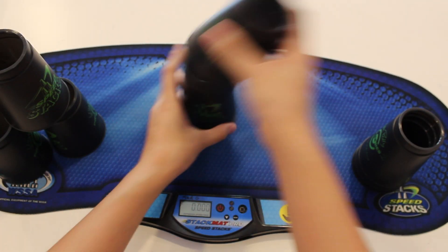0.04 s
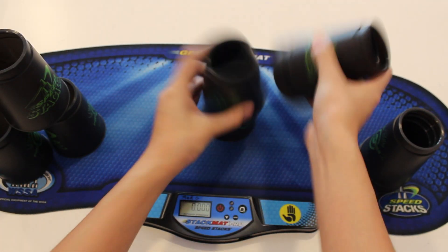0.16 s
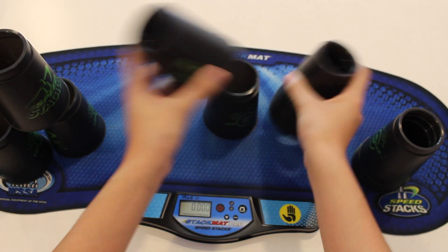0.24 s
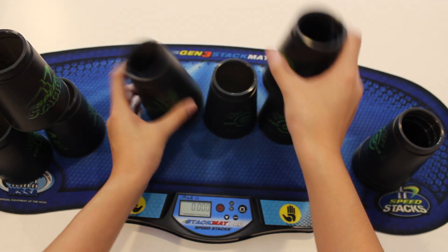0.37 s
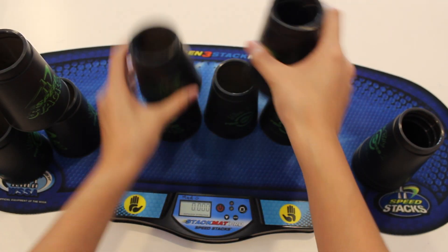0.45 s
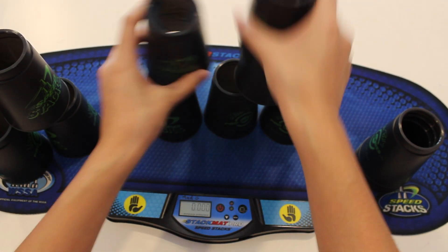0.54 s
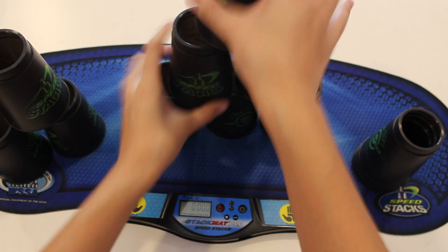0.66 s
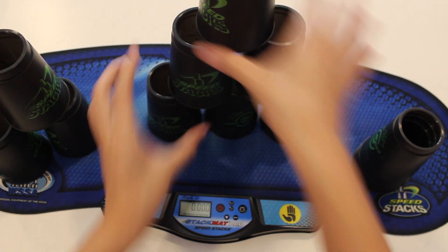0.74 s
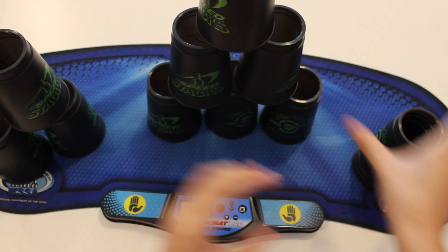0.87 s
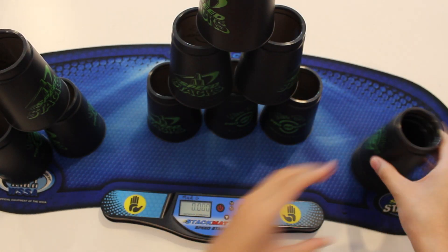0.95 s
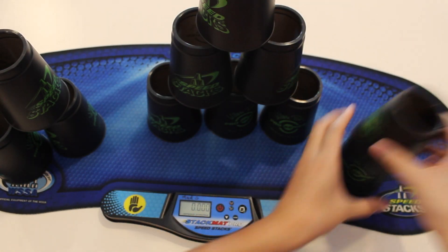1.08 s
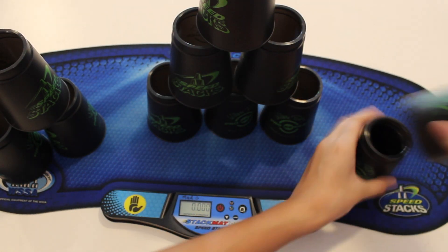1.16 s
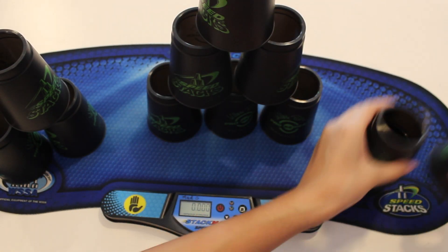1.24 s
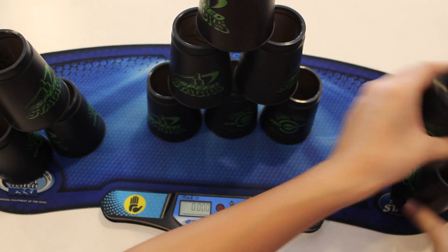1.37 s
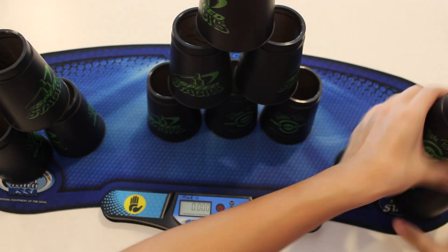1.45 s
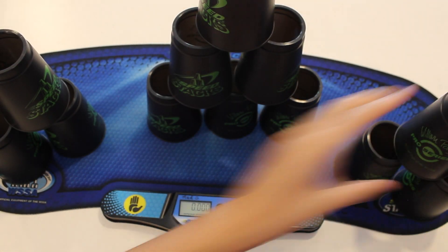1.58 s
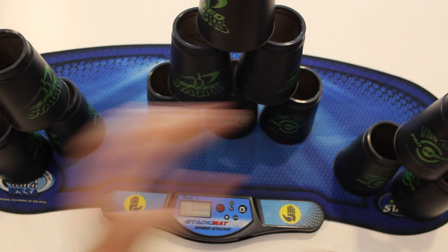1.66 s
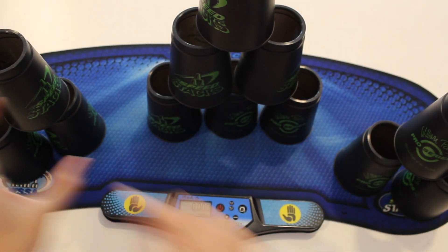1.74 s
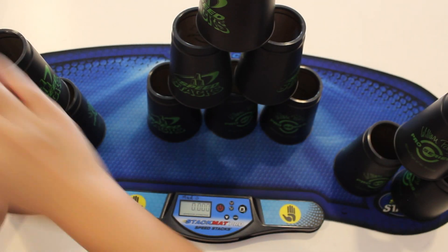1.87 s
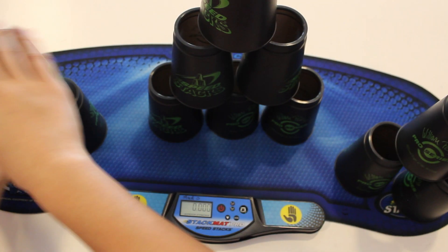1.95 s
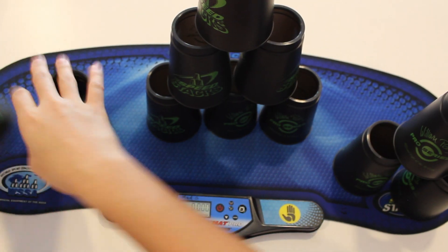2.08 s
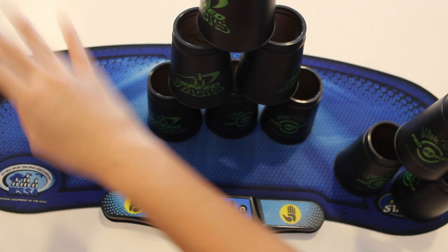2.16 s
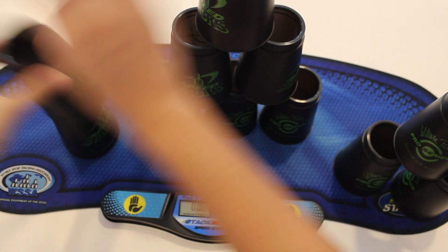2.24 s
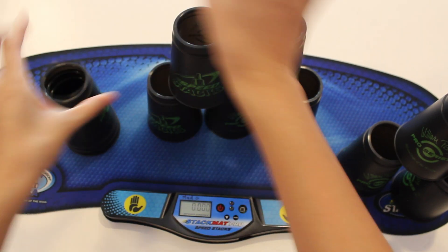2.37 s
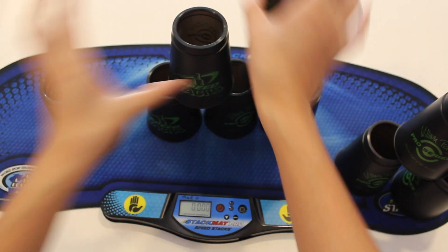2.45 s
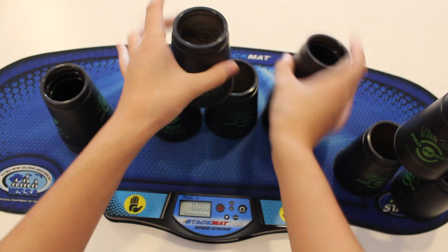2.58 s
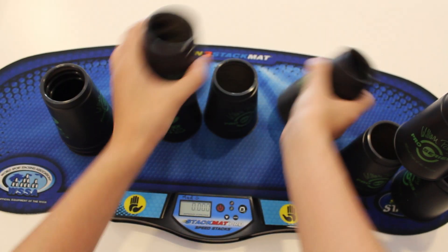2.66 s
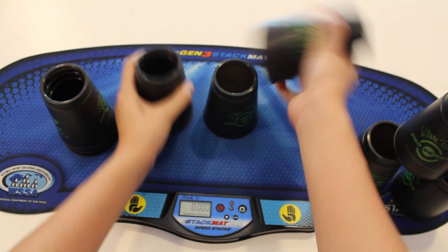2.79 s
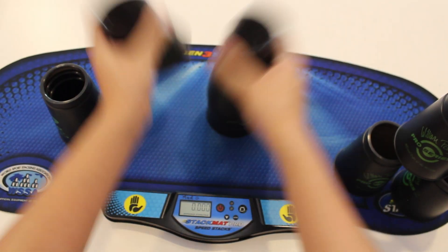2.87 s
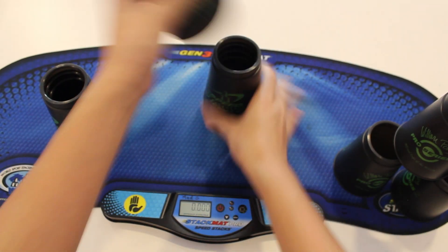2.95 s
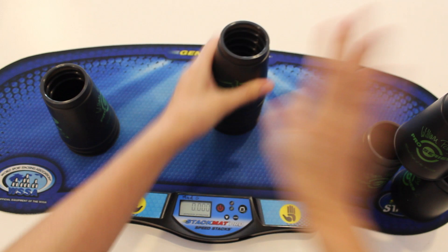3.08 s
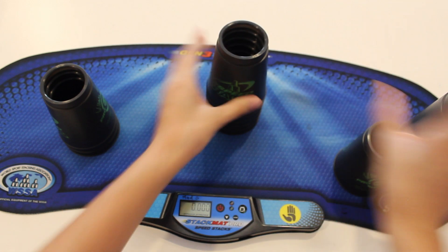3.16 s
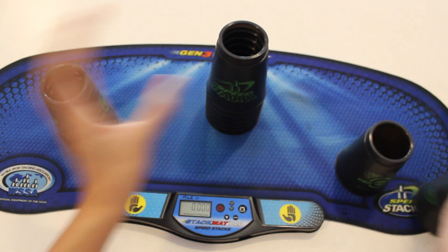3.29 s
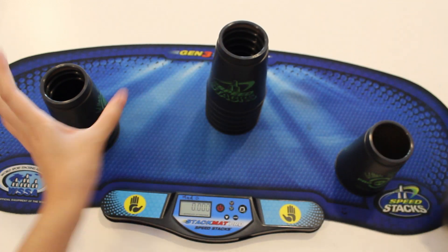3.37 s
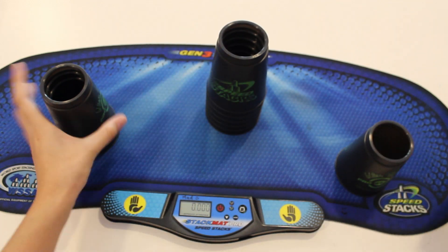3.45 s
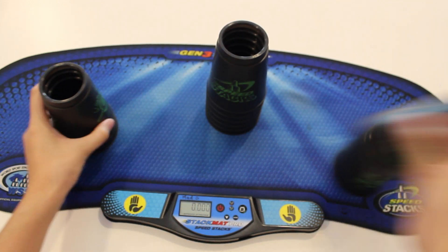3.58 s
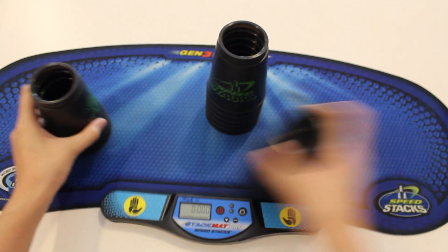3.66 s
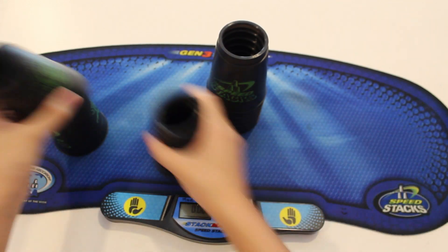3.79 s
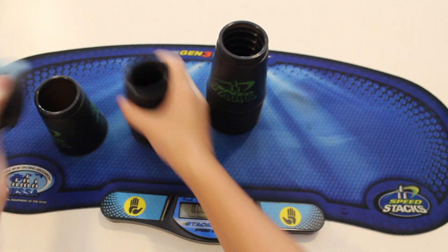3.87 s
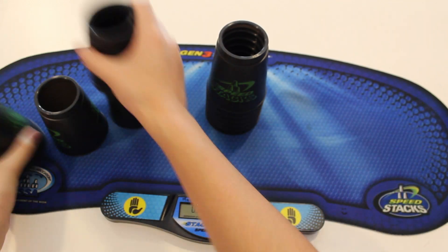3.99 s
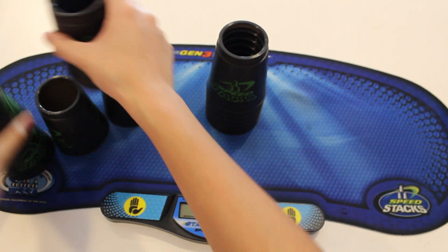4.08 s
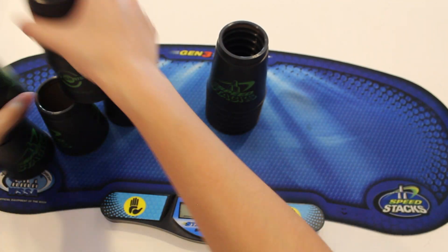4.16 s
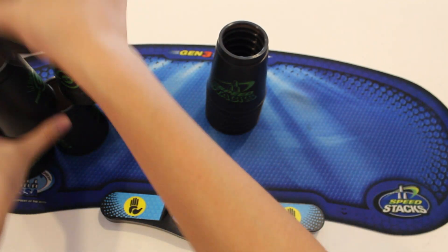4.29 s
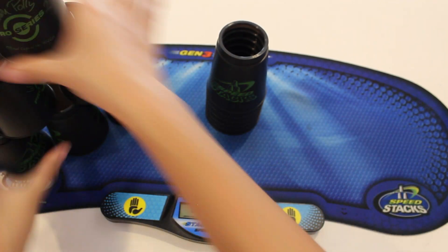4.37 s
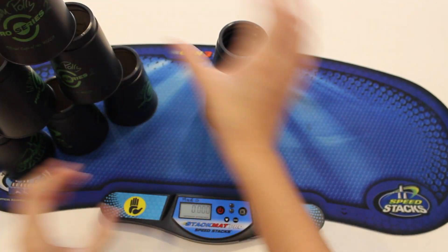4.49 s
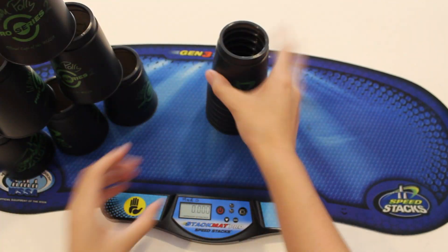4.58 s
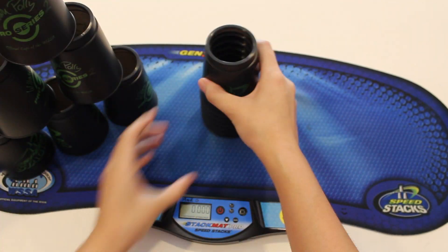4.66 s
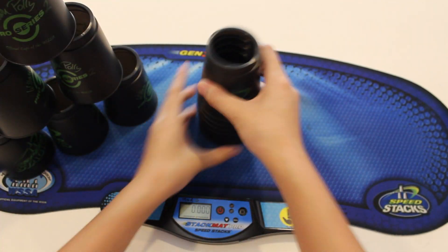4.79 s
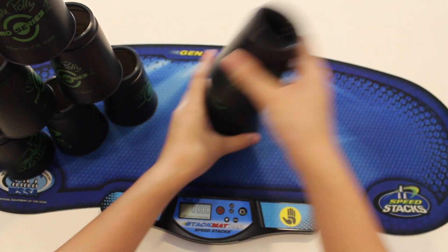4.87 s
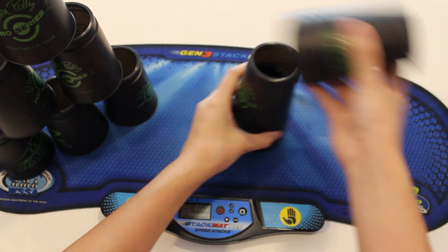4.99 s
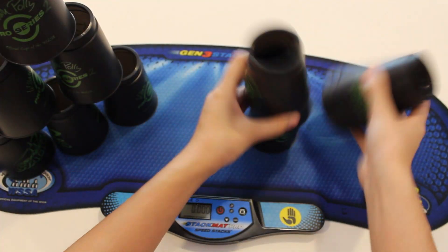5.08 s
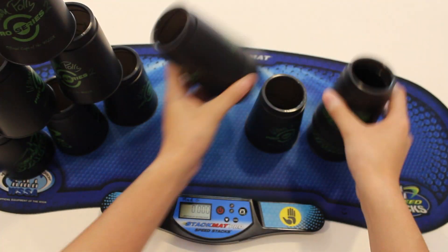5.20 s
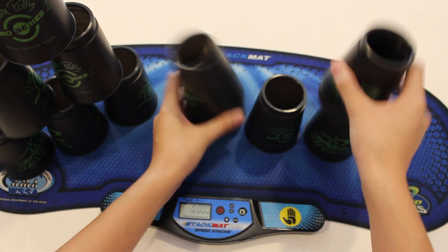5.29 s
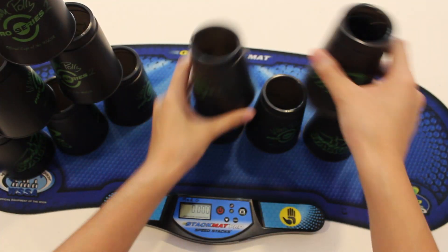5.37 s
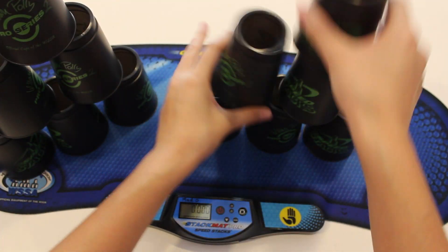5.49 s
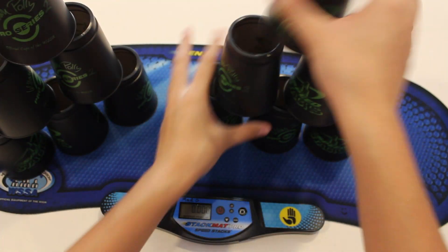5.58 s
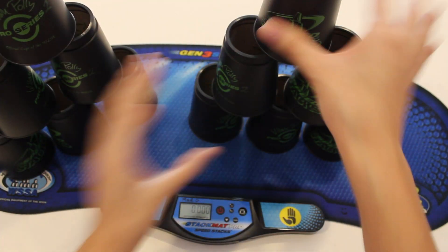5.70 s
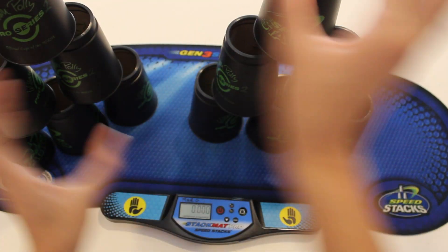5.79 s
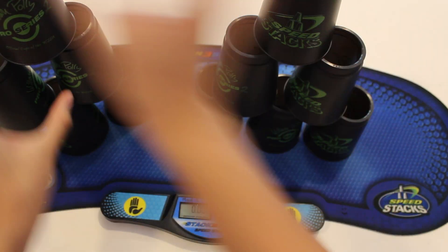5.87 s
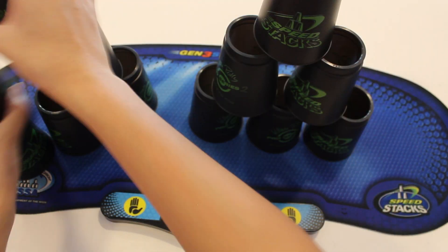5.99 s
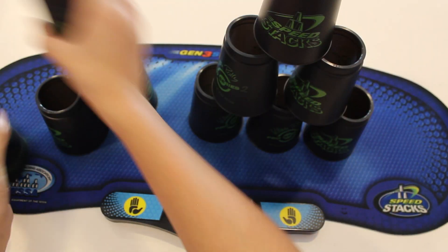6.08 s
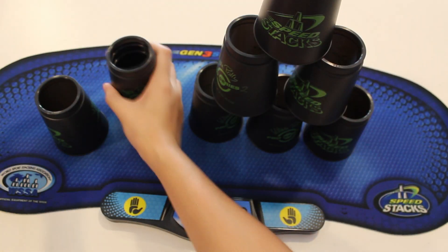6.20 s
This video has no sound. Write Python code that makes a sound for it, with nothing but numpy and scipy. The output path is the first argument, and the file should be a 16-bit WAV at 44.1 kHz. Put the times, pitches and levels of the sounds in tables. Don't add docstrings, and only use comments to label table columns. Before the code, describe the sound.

Hard plastic cups clack, knock and rattle in fast uneven bursts on a padded table mat, heard close up in a small room.

```python
import sys
import numpy as np
from scipy import signal
from scipy.fft import rfft, irfft
from scipy.io import wavfile
from scipy.ndimage import uniform_filter1d

SR = 44100
rng = np.random.default_rng(int(sys.argv[2]) if len(sys.argv) > 2 else 0)


def store_pcm(level_fs):
    pcm = np.round(np.clip(level_fs, -1, 1) * 32767).astype(np.int16)
    wavfile.write(sys.argv[1], SR, np.atleast_2d(pcm).T)


def undo_db(level):
    steps = np.asarray(level, float) / 20
    return 10 ** steps


N = 275184

# (frequency [Hz], level [dB per Hz])
ROOM_NOISE = [(15, -6), (25, -24), (108, 5), (134, -2.5), (195, 8), (326, -11.5), (714, 8), (863, 2),
              (2280, -7), (9570, -23), (16000, -23)]
# (frequency [Hz], level [dB per Hz])
SCRAPE_COLOUR = [(590, -4.5), (1000, 12), (1610, 7.5), (1910, 7.5), (2390, 4), (2940, 5.5), (5500, 0),
                 (8360, -6.5), (16000, -16.5)]
# (frequency [Hz], level [dB per Hz])
RUMBLE_COLOUR = [(71, -49), (120, -24.5), (270, -7.5), (326, -7.5), (399, -5), (2000, -29), (2600, -68),
                 (4400, -120)]
# (frequency [Hz], time to fall 60 dB [s])
ROOM_DECAY = [(300, .33), (700, .37), (1600, .36), (3400, .36), (6500, .34), (12000, .2)]
# (frequency [Hz], level [dB])
WALL_MODES = [(1240, -10), (1850, -26), (2930, -9.5), (3820, -12), (5300, -26)]
# (frequency [Hz], level [dB])
TABLE_MODES = [(204, 4.5), (290, 4), (360, -9), (450, -6.5), (614, 1), (720, -12.5)]

# (middle [s], level [dB], spread [s])
HAND_BRUSHES = [(0, -45, 0.046), (.3, -46.5, 0.2), (.6, -49.5, 0.11), (1.25, -49, 0.1), (1.5, -58, 0.11),
                (2.02, -42, 0.034), (2.3, -45.5, 0.21), (2.55, -34.5, 0.069), (2.75, -39, 0.094),
                (3.1, -41.5, 0.096), (3.45, -41, 0.08), (3.87, -39, 0.053), (4.1, -44, 0.087),
                (4.97, -43, 0.086), (5.15, -67, 0.065), (5.4, -42, 0.19), (5.6, -38, 0.034),
                (6.08, -48, 0.078)]
# (middle [s], level [dB], spread [s])
MAT_DRAGS = [(.25, -50, 0.23), (.65, -45, 0.12), (1.14, -54, 0.08), (1.325, -42, 0.037), (1.6, -61, 0.24),
             (2.03, -40, 0.043), (2.18, -31.5, 0.05), (2.56, -36, 0.11), (2.88, -38, 0.13),
             (3.34, -42.5, 0.11), (3.715, -23, 0.035), (4.1, -35.5, 0.067), (4.32, -33, 0.08),
             (4.7, -40.5, 0.021), (5.12, -46.5, 0.15), (5.6, -26.5, 0.077), (6.05, -60, 0.16),
             (6.24, -36, 0.11)]
# (start [s], end [s], level [dB], wall pitch [Hz])
CUP_SLIDES = [(0.34, 0.399, -35, 3010), (2.107, 2.115, -29.5, 3200), (2.49, 2.59, -44, 2860),
              (2.906, 3.006, -46.5, 3020), (3.311, 3.378, -41, 3020), (5.35, 5.433, -48, 2870),
              (3.68, 3.772, -35, 1890), (5.043, 5.127, -44.5, 2840), (6.023, 6.073, -39.5, 4160),
              (6.131, 6.134, -26, 5040)]
# (time [s], peak [dB], pitch [Hz])
GRAZES = [(0.57, -29, 3930), (.7797, -56, 4160), (1.126, -40.5, 3160), (1.244, -42, 2540),
          (1.5779, -53, 2740), (1.955, -53, 2650), (2.3252, -30, 6440), (2.352, -35, 2950),
          (2.3601, -37, 4950), (2.408, -30, 3170), (2.533, -28, 4500), (2.673, -35, 3300),
          (2.7093, -29, 5310), (2.903, -31, 4580), (2.9483, -41, 2730), (2.955, -33, 3180),
          (3.0281, -48, 3120), (3.0884, -39, 6500), (3.29, -40, 4500), (3.2965, -31, 4370),
          (3.3396, -28, 5470), (3.4023, -37, 5600), (3.453, -41, 2710), (3.9044, -42, 2600),
          (4.095, -24, 3030), (4.2294, -33, 5000), (4.6589, -43, 3600), (4.9162, -34, 3120),
          (5.06, -46, 4080), (5.067, -37, 3040), (5.107, -38, 4150), (5.223, -26.5, 5800),
          (5.2346, -36, 3070), (5.367, -24, 5000), (5.3932, -38, 4800), (5.544, -34, 5310),
          (6.0029, -40, 4490), (6.0827, -37, 4960), (6.1236, -19, 4770), (6.193, -27, 5000),
          (3.722, -30, 4770), (3.731, -21, 3300), (3.735, -22, 5200), (6.074, -34, 3100),
          (6.1768, -24, 2940), (0.133, -43, 9000)]
# (time [s], pitch [Hz], level [dB], time to fall 60 dB [s])
WALL_SHIVERS = [(.194, 1040, -38, 0.26), (0.55, 1900, -29.5, 0.44), (.674, 1310, -23, 0.071),
                (.72, 1240, -29, 0.32), (.72, 2040, -57, 0.25), (1.405, 1260, -27, 0.18),
                (1.405, 602, -8.5, 0.077), (2.442, 1800, -17, 0.032), (4.363, 1310, -35, 0.43),
                (1.487, 744, -23, 0.44), (1.487, 965, -30, 0.22), (1.961, 2170, -24.5, 0.092),
                (2.032, 1110, -28, 0.38), (2.151, 1930, -35, 0.63), (2.151, 900, -36, 0.58),
                (2.443, 1480, -28, 0.33), (2.497, 683, -35.5, 0.41), (2.497, 1470, -31, .3),
                (2.577, 1120, -30, 0.14), (2.577, 1990, -36, 0.33), (2.641, 1464, -21, 0.19),
                (2.69, 853, -20.5, 0.17), (2.689, 1840, -38, .3), (2.745, 830, -36, 0.17),
                (3.729, 1127, -27.5, 0.4), (3.784, 1135, -31, 0.27), (4.088, 1780, -40, .3),
                (4.87, 1220, -34.5, 0.32), (5.358, 1650, -30.5, 0.17), (5.616, 1250, -27, 0.54),
                (5.665, 1236, -24, 0.21), (6.013, 1250, -35, 0.22), (6.081, 1440, -24, 0.071),
                (6.13, 1870, -38, .3), (6.173, 2100, -38, 0.18),
                (0.456, 3080, -36, 0.41), (0.454, 4440, -39, 0.27), (.549, 3260, -39, 0.35),
                     (0.547, 3930, -33.5, 0.33), (0.548, 5370, -36, 0.42), (.68, 5050, -29, 0.073),
                     (.72, 5200, -34, 0.18), (5.664, 5200, -42, .3), (1.487, 5200, -48, .3),
                     (2.075, 3200, -42, 0.18), (2.076, 3840, -32, .2), (2.076, 6270, -36, 0.22),
                     (2.106, 4130, -29, 0.13), (2.153, 3100, -36, .3), (2.152, 5430, -36, 0.1),
                     (2.192, 3120, -41, 0.33), (2.545, 3000, -28, 0.062), (2.576, 3870, -29, 0.24),
                     (2.69, 5400, -36, 0.18), (2.796, 2920, -39, 0.12), (2.972, 3200, -34, 0.43),
                     (2.972, 3800, -45, 0.36), (3.125, 2420, -36, 0.42), (3.123, 3430, -31, 0.19),
                     (3.425, 3840, -41, 0.25), (3.728, 3080, -26.5, 0.21), (4.198, 2790, -29, 0.098),
                     (4.199, 5100, -32, 0.18), (4.265, 4100, -43, 0.34), (5.044, 4140, -47, .3),
                     (5.06, 2900, -45, 0.45), (5.078, 4730, -46, .1), (5.1, 4200, -37.5, 0.1),
                     (5.1, 5630, -46, 0.18), (5.157, 3280, -44, 0.31), (5.203, 3940, -38.5, 0.34),
                     (5.204, 3020, -32, 0.26), (5.281, 3060, -34, .15), (5.357, 2910, -26, 0.22),
                     (5.358, 3970, -17.5, 0.063), (5.511, 3880, -35, .2), (5.571, 2800, -46, .2),
                     (5.614, 3925, -36, 0.24), (5.615, 5530, -34, 0.2), (6.035, 4040, -43, .1),
                     (6.063, 2900, -46, 0.32), (6.063, 5300, -44, .3), (6.172, 3350, -11, 0.047),
                     (6.173, 4950, -41, 0.14)]

# (time [s], peak [dB], air pitch [Hz], time to fall 60 dB [s])
MAT_LANDINGS = [(0.153, -25, 245, 0.022), (0.4455, -13, 320, 0.04), (1.408, -10.5, 405, 0.035),
                (2.1072, -14.5, 587, 0.03), (2.1502, -23.5, 740, 0.018), (2.6907, -10.5, 790, 0.025),
                (2.7932, -23, 527, 0.029), (3.1237, -16.5, 468, 0.03), (4.0118, -29.5, 282, 0.02),
                (4.3608, -11, 595, 0.041), (4.8668, -23, 359, 0.089), (4.9363, -25, 352, 0.069),
                (5.1198, -23.5, 266, 0.045), (5.2025, -11, 281, 0.06), (5.3516, -6.5, 355, 0.026),
                (5.3819, -22.5, 360, 0.04), (6.171, -16, 810, 0.03)]
# (time [s], peak [dB], air pitch [Hz], time to fall 60 dB [s])
STACK_LANDINGS = [(0.2667, -21, 328, 0.028), (0.3255, -18, 254, 0.049), (0.5506, -7.5, 652, 0.016),
                  (1.0238, -35, 288, 0.11), (1.3915, -5, 420, 0.07), (2.3673, -30.5, 308, 0.031),
                  (2.97, -9.5, 338, 0.032), (3.6462, -5, 496, 0.023), (3.8207, -23, 672, 0.068),
                  (4.0494, -15, 298, 0.055), (4.0846, -18, 524, 0.072), (4.2914, -16.5, 600, 0.029),
                  (4.3039, -11.5, 626, 0.035), (5.092, -33.5, 402, 0.12), (5.482, -4.5, 560, 0.017),
                  (5.6658, -6, 553, 0.033), (5.7844, -35.5, 588, 0.15)]
# (time [s], peak [dB], air pitch [Hz], time to fall 60 dB [s])
HIGH_LANDINGS = [(0.6141, -26, 690, 0.05), (0.6745, -10, 558, 0.05), (0.7204, -12, 617, 0.042),
                 (1.4881, -2, 665, 0.024), (1.9591, -34.5, 535, 0.12), (2.017, -18.5, 253, 0.07),
                 (2.4303, -22.5, 510, 0.066), (2.4426, -18, 320, 0.067), (2.5497, -17, 663, 0.05),
                 (3.2714, -31, 635, 0.11), (3.3104, -22.5, 416, 0.095), (3.4052, -25.5, 420, 0.13),
                 (4.201, -5.5, 625, 0.015), (5.511, -11.5, 590, 0.032), (5.5731, -13, 593, 0.044),
                 (5.616, -13, 600, 0.021), (6.014, -23.5, 602, 0.053), (6.031, -42, 600, 0.052),
                 (6.0587, -20.5, 641, 0.22), (6.2312, -14.5, 345, 0.015)]
# (table, deep share [dB])
LANDING_KINDS = [(MAT_LANDINGS, 7.2), (STACK_LANDINGS, -6), (HIGH_LANDINGS, -37)]

# (time [s], peak [dB], loudest wall pitch [Hz], mid share [dB])
RIM_SNAPS = [(0.4415, -17, 3400, -24), (2.013, -38, 1200, -9), (2.0423, -33, 1110, 10),
             (2.1049, -15, 2780, 11), (2.191, -22.5, 1740, 7), (2.4426, -12, 1705, 7),
             (2.4947, -16.5, 2950, 1), (2.6894, -16, 1730, 3.5), (2.7716, -29, 3170, -23),
             (2.9716, -7.5, 3060, 11), (3.066, -30, 5540, -1), (4.0882, -28.5, 3100, -2),
             (4.2909, -19.5, 1260, 7.5), (5.2805, -23.5, 4240, 11), (5.51, -26.5, 1620, 11.5),
             (6.0919, -8.5, 4780, 9.5), (6.1078, -24, 5540, -23), (6.1128, -16, 5800, -9),
             (6.13, -22, 4700, 19.5), (6.229, -12.5, 3880, 13.5)]
# (time [s], peak [dB], loudest wall pitch [Hz], mid share [dB])
ROUND_TICKS = [(0.4537, -6.5, 2920, -0.5), (0.0029, -27.5, 3020, -17), (0.1935, -26, 1170, 2.5),
               (1.4038, -44.5, 1550, 22.5), (1.493, -23, 1500, -13), (2.1027, -10.5, 3250, 9),
               (2.1505, -4.5, 1974, -1), (2.5762, -8.5, 1980, -4), (2.9115, -27, 3430, 13),
               (4.129, -23.5, 1730, -6), (4.198, -9.5, 4100, 17), (4.3106, -29, 1600, 6),
               (4.8705, -26, 1325, 6.5), (5.077, -32.5, 4550, -15), (5.3577, -10, 3000, 5.5),
               (6.1736, -16.5, 2040, 11.5), (6.193, -22, 2840, 5)]
# (time [s], peak [dB], loudest wall pitch [Hz], mid share [dB])
BRIGHT_RAPS = [(2.3136, -37.5, 5560, 7), (2.3421, -33, 1230, -2), (2.366, -26.5, 4300, 14.5),
               (2.8327, -33.5, 3320, -6), (3.1228, -15.5, 1370, 7.5), (3.6442, -17, 3350, 14),
               (3.656, -26, 5560, -24), (4.1183, -28, 1780, -10), (4.2125, -26, 1560, 4),
               (4.665, -37, 3820, 13), (4.9417, -39, 1600, 17), (6.0621, -42.5, 1240, 22.5),
               (6.1707, -10, 2090, -4)]
# (time [s], peak [dB], loudest wall pitch [Hz], mid share [dB])
STACK_KNOCKS = [(0.1377, -41, 1600, 4), (0.3246, -33, 2830, 2), (0.6733, -19, 1280, 9),
                (0.7188, -8.5, 1400, 0.5), (1.0257, -46.5, 1590, 5), (1.0672, -46.5, 1560, 1),
                (1.486, -8, 1560, 1.5), (2.428, -30, 1530, 9), (2.502, -27, 980, -13),
                (2.6261, -24, 3320, -21), (2.641, -17, 1440, 1), (2.7445, -24.5, 3400, -13.7),
                (2.927, -27.5, 3080, -3), (3.7265, -19, 1930, 6.5), (3.8225, -26, 1540, 1),
                (4.0778, -24.5, 2580, -7), (4.3602, -11, 1380, 3), (5.1557, -35.5, 1760, -3),
                (5.412, -32, 2880, -3), (5.6644, -8, 1296, 0), (6.0729, -28, 1260, 3)]
# (time [s], peak [dB], loudest wall pitch [Hz], mid share [dB])
SKIDS = [(0.052, -39.5, 6150, -9), (0.548, -16, 1870, -3), (1.9608, -31.5, 1160, 5.5),
         (2.0315, -23.5, 1200, 9.5), (2.0752, -18, 3360, 9), (2.096, -21.5, 5440, 15),
         (2.5417, -24, 3000, 5), (2.7815, -26, 3040, -11), (2.9547, -39.5, 2760, 28),
         (3.3086, -22.5, 3300, 12), (3.4228, -27, 1520, 2), (3.6823, -21, 1260, -19),
         (3.7096, -17, 1820, -9), (3.7174, -16.5, 3030, 13), (3.7835, -17.5, 1700, 3),
         (4.0476, -28, 3580, 13), (4.2628, -28.5, 1320, 4), (4.6738, -36, 1270, -4),
         (5.0432, -29.5, 3170, -13), (5.1803, -44, 1960, 11), (5.2048, -26, 860, 1.5),
         (5.2155, -33, 1720, 6.5), (5.4803, -17, 1020, -2), (5.5684, -19, 1370, -1.5),
         (5.6143, -20.5, 1570, 0.5), (6.0102, -37.5, 1420, 6.5), (6.1597, -22.5, 1900, -5)]
# (time [s], peak [dB], loudest wall pitch [Hz], mid share [dB])
HAND_MUTED = [(0.6818, -24, 1450, 7), (1.3897, -29, 1980, -5), (2.4897, -22, 4700, 15),
              (2.7933, -29, 5000, -7), (4.3028, -14.5, 1640, -0.5), (4.896, -28, 2900, 12),
              (0.686, -14, 1310, -2), (5.3513, -25, 3000, 11), (5.5185, -19.5, 990, -0.5),
              (6.09, -19, 5160, 12)]
# (table, top share [dB], contact length [ms])
CONTACT_KINDS = [(RIM_SNAPS, -4.5, 0.73), (ROUND_TICKS, -9.5, 1), (BRIGHT_RAPS, -4, 2.86),
                 (STACK_KNOCKS, -13.5, 2.35), (SKIDS, -12, 4.3), (HAND_MUTED, -36, 1)]

LN1000 = np.log(1000)
SPOTS = 5


def add(out, x, s):
    i = int(s * SR)
    out[i:i + len(x)] += x[:len(out) - i]


def unit(x):
    return x / np.sqrt(np.mean(x ** 2))


def peak(x, db, size=88):
    return x * undo_db(db) / np.sqrt(uniform_filter1d(x ** 2, size).max())


def seconds(length_s):
    return np.arange(int(length_s * SR)) / SR


def band(x, lo_hz, hi_hz, order=3):
    edges = [lo_hz, min(hi_hz, .45 * SR)]
    return signal.sosfilt(signal.butter(order, edges, "band", fs=SR, output="sos"), x)


def colour(x, points):
    hz, db = np.transpose(points)
    f = np.arange(N // 2 + 1) * SR / N + 1
    gain = undo_db(np.interp(np.log(f), np.log(hz), db))
    return unit(irfft(rfft(x) * gain, N))


def ring(t, hz, db, t60):
    notes = np.sin(2 * np.pi * np.outer(hz, t))
    return undo_db(db) @ (notes * np.exp(-LN1000 * t / t60[:, None]))


def room_noise(loud):
    memory_s = .12
    step = 1 / (memory_s * SR)
    memory = signal.lfilter([step], [1, step - 1], loud ** 2)
    duck = (1 + memory / undo_db(-65)) ** -.36
    noise = colour(rng.standard_normal(N), ROOM_NOISE) * undo_db(-46.5)
    offset = undo_db(-61)
    return (noise + offset) * duck


def room(x):
    t = seconds(.5)
    echo = np.zeros(len(t))
    for f, t60 in ROOM_DECAY:
        noise = band(rng.standard_normal(len(t)), f / 1.42, f * 1.62, order=2)
        echo += noise * np.exp(-LN1000 * t / t60)
    echo = echo * np.clip((t - .004) / 0.011, 0, 1)
    return signal.fftconvolve(x, echo / np.sqrt(np.sum(echo ** 2)))[:N]


def chatter(rate_hz, spread_db, steady):
    knocks = (rng.random(N) < rate_hz / SR) * undo_db(spread_db * rng.standard_normal(N))
    strength = signal.lfilter([1], [1, -.98], knocks) + steady
    return unit(strength * colour(rng.standard_normal(N), SCRAPE_COLOUR))


def swells(table, rest_db):
    t = np.arange(N) / SR
    return undo_db(rest_db) + sum(undo_db(db) * np.exp(-.5 * ((t - s) / spread) ** 2) for s, db, spread in table)


def rubbing():
    rumble = colour(rng.standard_normal(N), RUMBLE_COLOUR)
    rustle = chatter(200, spread_db=5, steady=1.8)
    return rustle * swells(HAND_BRUSHES, -62.5) + rumble * swells(MAT_DRAGS, -63)


def slides():
    out, grain = np.zeros(N), chatter(400, spread_db=3, steady=1.5)
    for s, end, db, pitch in CUP_SLIDES:
        part = band(grain[int(s * SR):int(end * SR)], pitch / 1.25, 16500, order=2)
        part = part + 3.3 * np.gradient(part)
        phase = 2 * np.pi * np.cumsum(pitch * np.linspace(1, 1.12, len(part))) / SR
        flutter = unit(band(rng.standard_normal(len(part)), 3.3, 68, order=1))
        song = 0.6 * np.sin(phase) + .3 * np.sin(1.7 * phase)
        part = part + (1 + flutter) * song
        shape = signal.windows.tukey(len(part), .3) * np.linspace(.6, 1, len(part))
        add(out, undo_db(db) * part * shape, s)
    return out


def grazes():
    out, t = np.zeros(N), seconds(.02)
    for s, db, hz in GRAZES:
        noise = rng.standard_normal(len(t)) * np.exp(-t / 0.00285)
        tone = peak(band(noise, hz / 1.05, hz * 1.05, order=1), -7)
        crack = peak(band(noise, 1700, 8500, order=1), -2)
        add(out, peak(crack + tone, db + .3), s)
    return out


def shivers():
    out, t = np.zeros(N), seconds(.27)
    rise = 1 - np.exp(-t / 0.0014)
    fade_out = np.cos(np.pi / 2 * t / t[-1])
    for s, hz, db, t60 in WALL_SHIVERS:
        half_hz = 135 * (hz / 1000) ** 0.73 / 2
        noise = rng.standard_normal(2 * len(t))
        mode = unit(band(noise, hz - half_hz, hz + half_hz, order=2)[len(t):])
        add(out, undo_db(db) * mode * rise * np.exp(-LN1000 * t / t60) * fade_out, s)
    unsteady_db = 3.5 * unit(band(rng.standard_normal(N), 15, 120, order=1))
    return out * undo_db(unsteady_db)


def thuds():
    out, far, t = np.zeros(N), np.zeros((SPOTS, N)), seconds(.25)
    click = 1. * (t == 0)
    hz, db = np.transpose(TABLE_MODES)
    rows = sorted((*row, deep_db) for table, deep_db in LANDING_KINDS for row in table)
    chance = rng.standard_normal((len(rows), 2, len(hz)))
    for k, ((s, top_db, pitch, decay, deep_db), (tune, place)) in enumerate(zip(rows, chance)):
        decay = np.clip(decay, .013, .12)
        air = ring(t, pitch * np.array([1, 1.09, 2.03]), np.array([0, -6., -12]), decay * np.array([1, .7, 1.2]))
        deep = np.where(hz < 330, deep_db + 0.5, 0)
        table = ring(t, hz * (1 + 0.047 * tune), db + deep + 3 * place, np.full(len(hz), .09))
        push = 0.089 * rng.standard_normal(len(t)) * np.exp(-t / (0.34 * decay))
        push[0] = 1
        body = signal.fftconvolve(peak(air, 0.072) + peak(table, -5.5), push)[:len(t)]
        body = peak(body * (1 - np.exp(-t / 0.0013)), top_db - .3)
        add(out, body, s - .001)
        knock = peak(band(click, pitch / 1.5, pitch * 2), top_db + 2)
        add(far[k % SPOTS], 0.4 * body + knock, s)
    return out, far


def registers(x, mid_db, top_db):
    mid = peak(band(x, 1050, 2030), mid_db - 19.0)
    upper = peak(band(x, 2580, 5920), -0.95)
    top = peak(band(x, 7220, 14100), top_db - .3)
    return mid + upper + top


def clacks():
    out, far, t = np.zeros(N), np.zeros((SPOTS, N)), seconds(.1)
    click = 1. * (t == 0)
    hz, db = np.transpose(WALL_MODES)
    rows = []
    for table, share_db, ms in CONTACT_KINDS:
        for row in table:
            rows.append((*row, share_db + max(row[3] - 18, 0), ms))
    rows.sort()
    chance = rng.standard_normal((len(rows), 2, len(hz)))
    for k, ((s, peak_db, pitch, mid_db, hiss_db, ms), (tune, hold)) in enumerate(zip(rows, chance)):
        fade = np.exp(-t / np.clip(ms * 0.0011, .0003, .008))
        contact = rng.standard_normal(len(t)) * (fade + 0.048 * np.exp(-t / 0.0071))
        near_db = db + 3 * hold - 14 * np.abs(np.log2(hz / pitch))
        all_hz = np.append(hz, pitch)
        t60 = np.append(np.full(len(hz), 0.066), .018) * np.minimum(1, 1900 / all_hz) ** .65
        walls = ring(t, np.append(hz * (1 + tune / 50), pitch), np.append(near_db, 9), t60)
        walls = signal.fftconvolve(walls, contact)[:len(t)]
        low_db = mid_db if pitch < 2400 else 0
        hit = peak(walls, -2.0 + low_db)
        add(out, (hit + registers(contact, mid_db, hiss_db)) * undo_db(peak_db + 2.0), s + .0005)
        body_t60 = np.append(np.full(len(hz), .03), .01)
        body = peak(ring(t, all_hz, np.append(near_db, 0), body_t60), -3 + low_db)
        smooth = np.sqrt(ms) * (body + registers(click, mid_db + 6.5, hiss_db))
        add(far[k % SPOTS], smooth * undo_db(peak_db), s)
    return out, far


def scene():
    rims, rims_far = clacks()
    landings, landings_far = thuds()
    sliding = slides()
    sent = undo_db(-14.5) * rims_far + undo_db(-9.5) * landings_far + undo_db(-12.5) * sliding
    echoes = sum(room(spot) for spot in sent)
    cups = rims + landings + sliding + echoes + rubbing()
    cups = signal.sosfilt(signal.butter(4, 223.7, "high", fs=SR, output="sos"), cups)
    hush = room_noise(cups)
    small = shivers() + grazes()
    return (cups + hush + small + undo_db(-17.0) * room(small))[None]


def roll_off(x):
    return signal.sosfilt(signal.butter(12, 15850, fs=SR, output="sos"), x)


def record(dry):
    dry = signal.sosfilt(signal.butter(12, 15850, fs=SR, output="sos"), dry)
    bent = dry * undo_db(0.07) - undo_db(-21) * np.clip(dry, -1, 1) ** 4
    mix = np.clip(bent, -1, 1)
    return roll_off(mix)


dry = scene()
out = record(dry)
store_pcm(out)
```